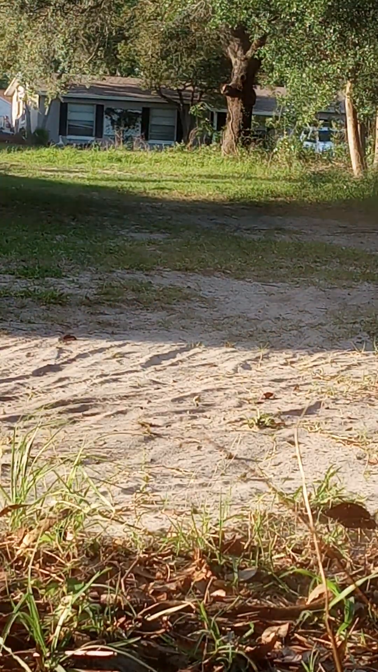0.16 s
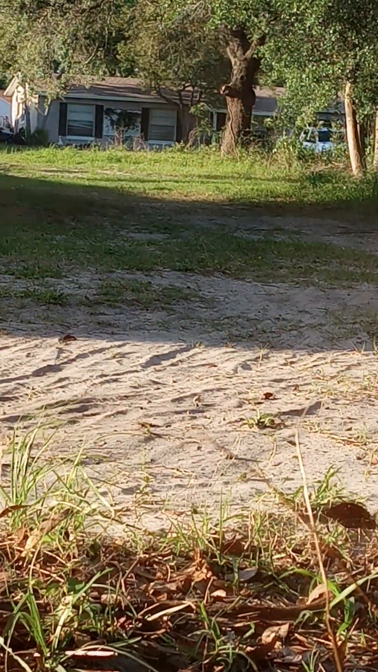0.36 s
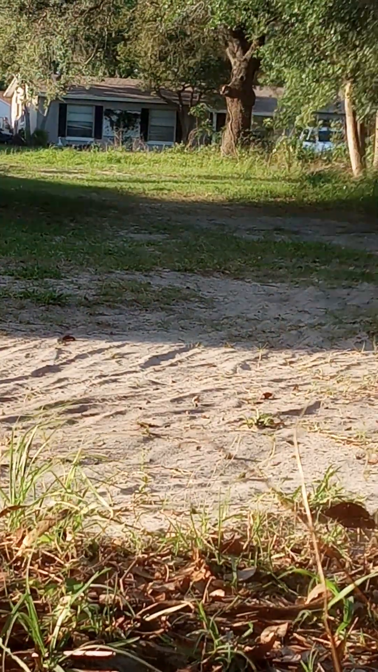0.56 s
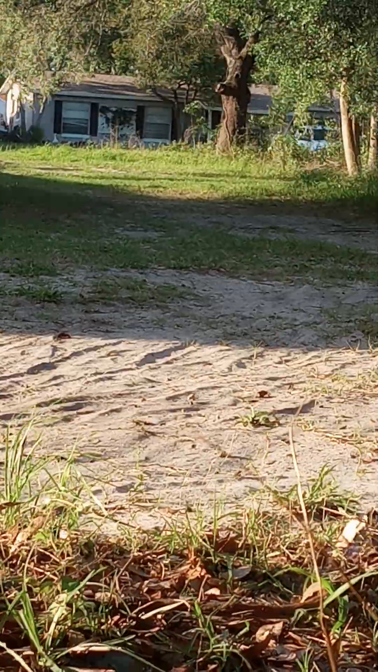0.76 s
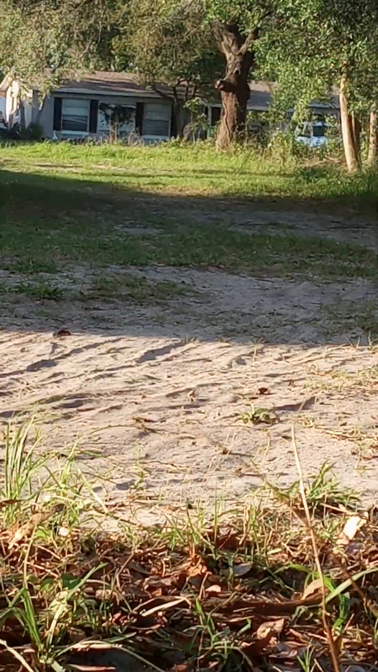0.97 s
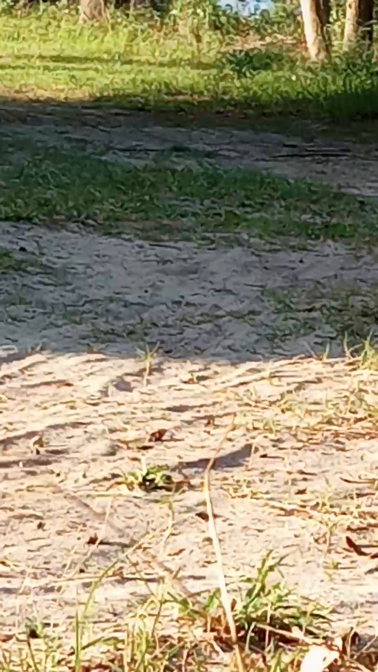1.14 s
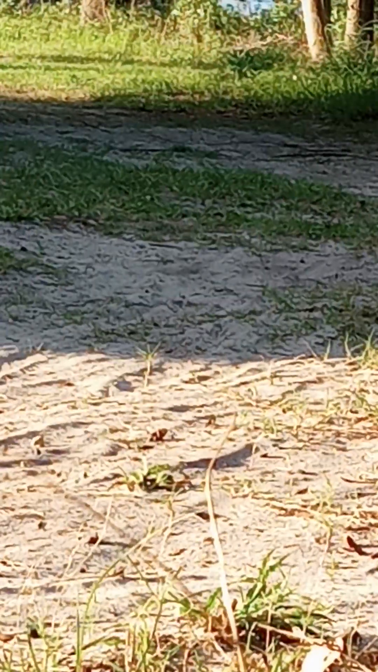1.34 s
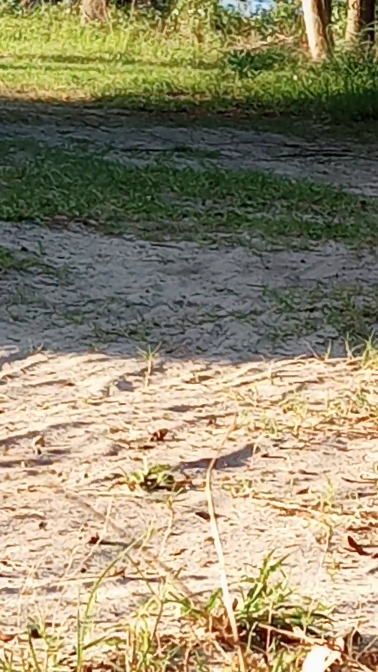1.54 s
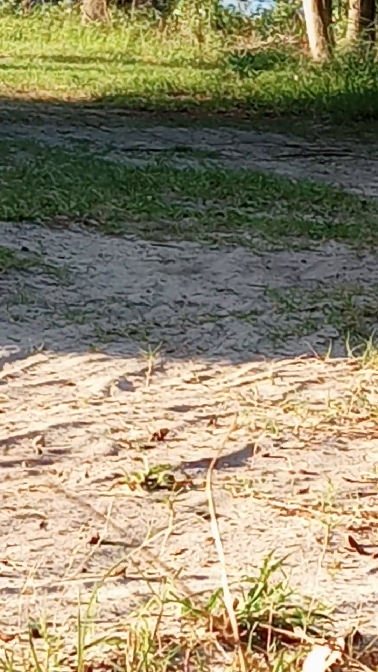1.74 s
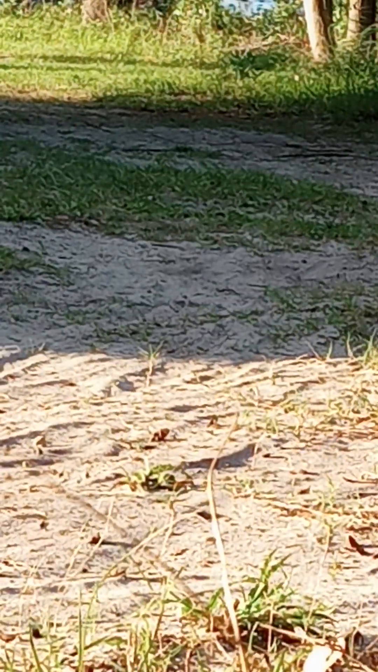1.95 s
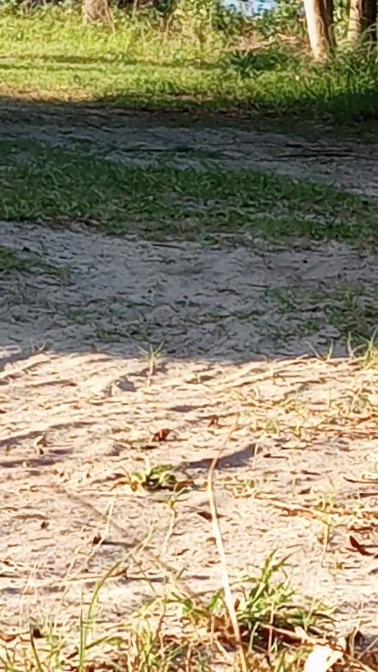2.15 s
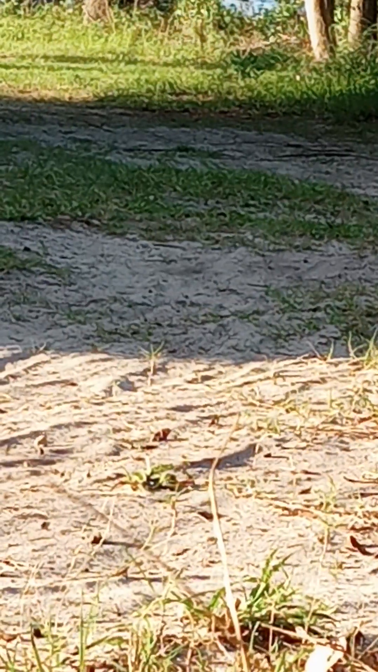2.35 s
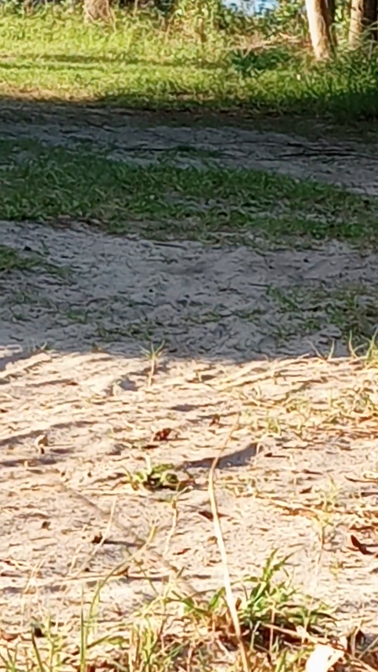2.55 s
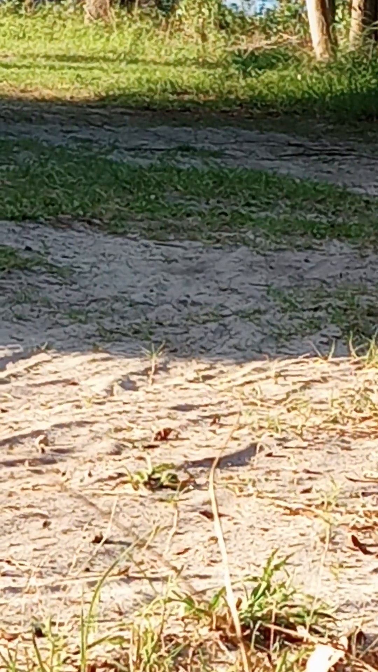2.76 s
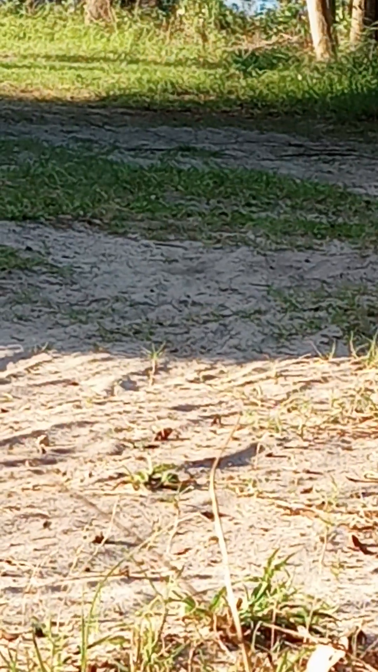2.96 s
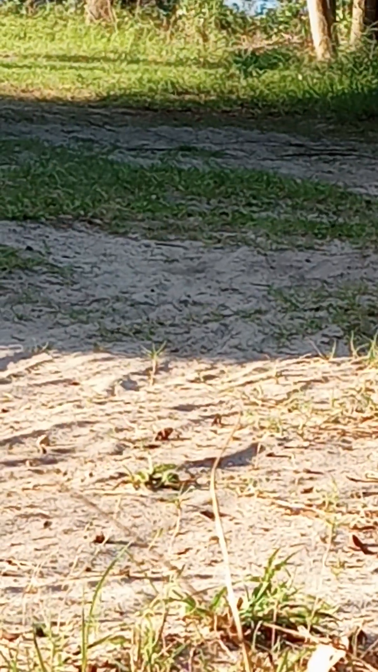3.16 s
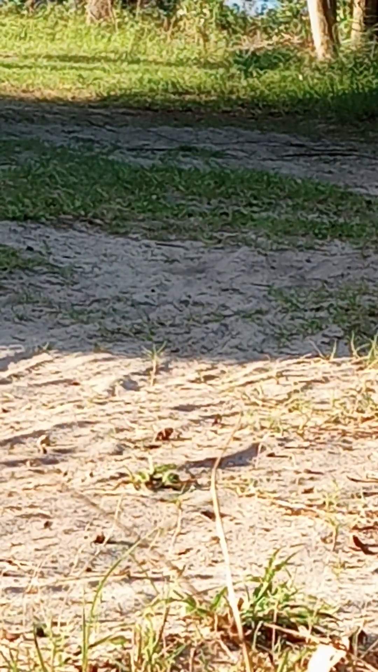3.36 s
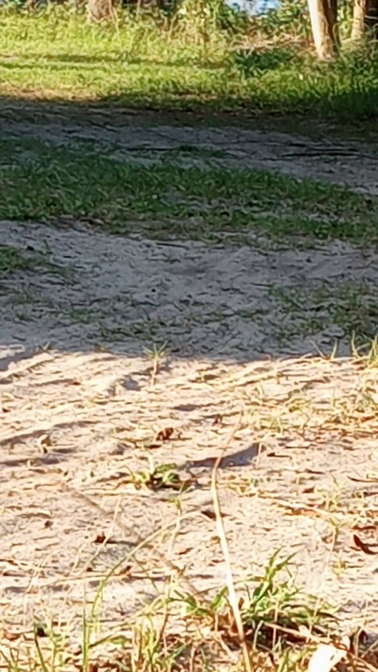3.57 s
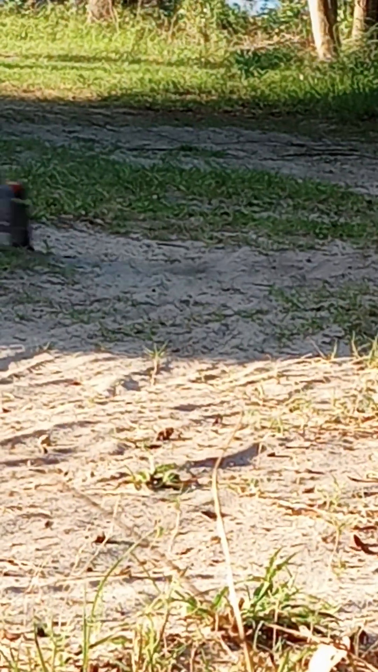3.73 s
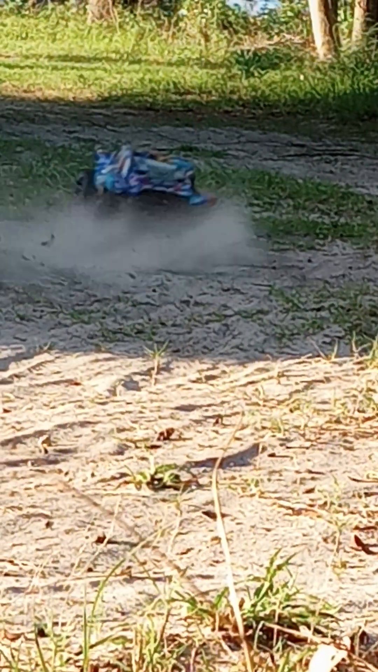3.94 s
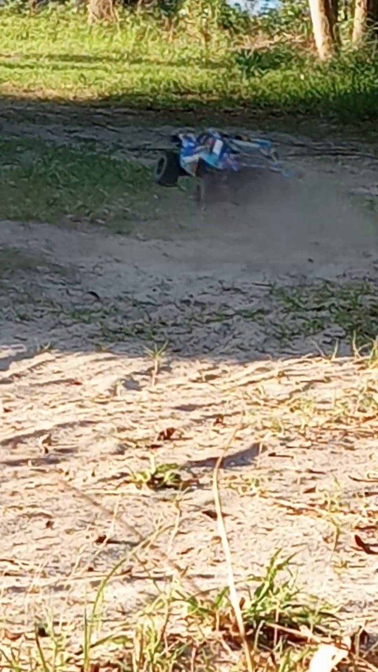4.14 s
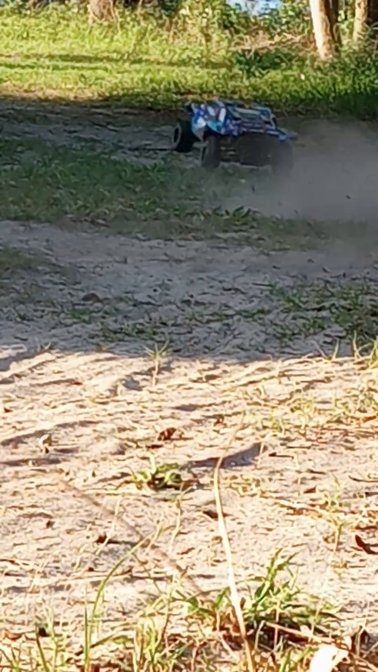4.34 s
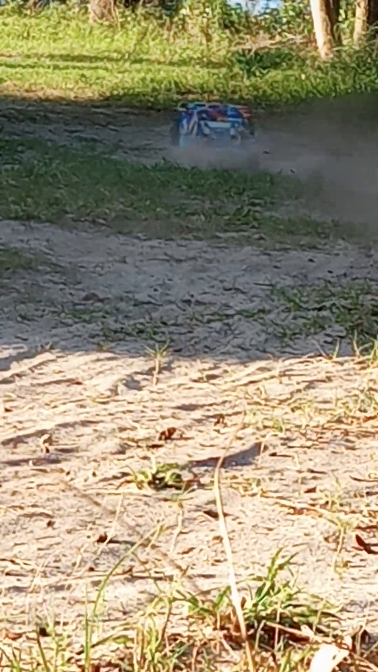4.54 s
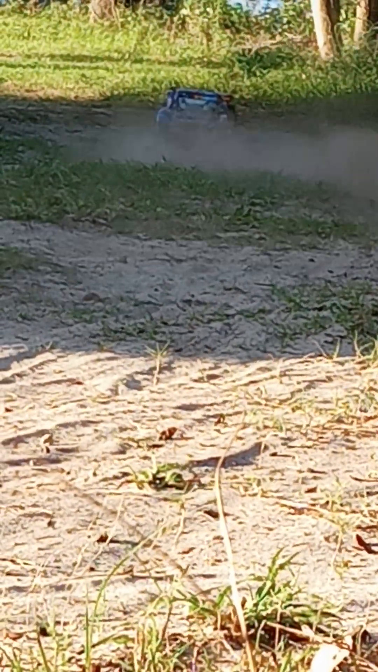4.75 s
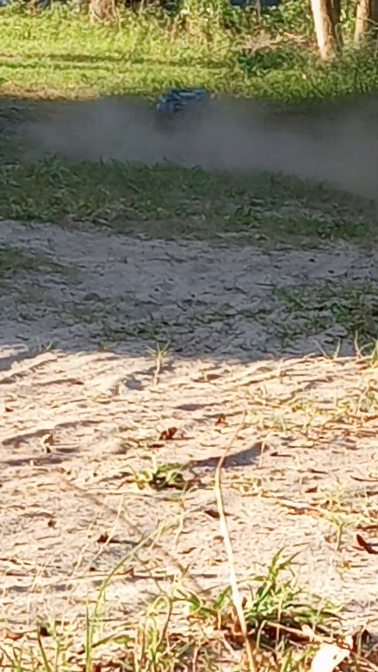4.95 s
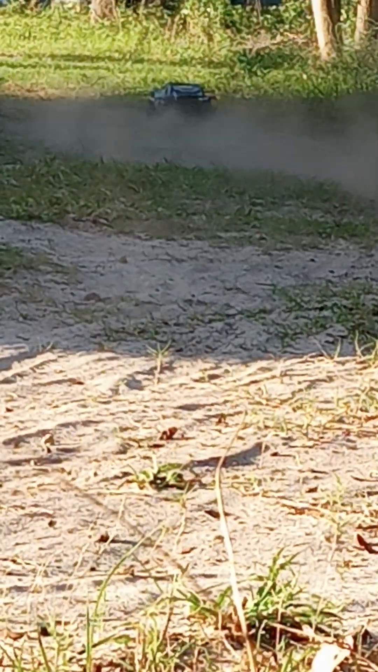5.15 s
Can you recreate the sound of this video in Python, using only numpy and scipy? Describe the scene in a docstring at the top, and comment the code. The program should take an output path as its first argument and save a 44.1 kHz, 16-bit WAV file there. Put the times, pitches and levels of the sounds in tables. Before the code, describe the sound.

Dry leaves crackle and snap close on the right for the first 0.3 seconds, with one light fingertip knock on a housing at the very start. A low outdoor rumble swells softly underneath. The sound cuts out briefly at 0.8 seconds and again from 1.1 to 1.45. At 1.5 seconds a small electric model truck starts close on the right with a short motor groan. It is driven in quick bursts, about four a second, each with a high gear whine that rises and falls, a drivetrain rattle and the hiss of tyres throwing sand. The bursts grow stronger from 2.4 to 3.2 seconds. The chassis thuds over several bumps around 3.3 to 3.5, and sand spatters the body shell. By 4 seconds the truck is farther away ahead, revving higher, with sharp knocks near 4.35, 4.65 and 5 seconds and a faint outdoor echo.

```python
"""A sandy yard. Dry leaves crackle close by over a low outdoor rumble; a fingertip knocks on a housing.
A small electric model truck is then driven in bursts, first close on the right, then away ahead.
Its gear teeth whine with each squeeze of the throttle, the drivetrain rattles, spinning tyres throw
sand and the chassis thuds over bumps. The sound cuts out twice before the truck starts."""
import sys
import numpy as np
from scipy import signal
from scipy.fft import rfft, irfft
from scipy.io import wavfile
from scipy.ndimage import uniform_filter1d

SR = 44100
rng = np.random.default_rng(int(sys.argv[2]) if len(sys.argv) > 2 else 0)


def dump_mix(stems):
    """Bounce the given channels to the path in sys.argv[1] as a 16-bit WAV at rate SR."""
    frames = np.atleast_2d(stems).T  # one column per channel
    limited = np.clip(frames, -1, 1)  # hard clip at full scale
    pcm = np.round(limited * 32767).astype(np.int16)
    wavfile.write(sys.argv[1], SR, pcm)


N = 229408
TIME = np.arange(N) / SR
FREQS = np.maximum(np.arange(N // 2 + 1) * SR / N, 1)
TEETH_PER_SHAFT_TURN, TEETH_PER_WHEEL_TURN = 10, 88
THROTTLE_LAG_S = 0.016
CUTOFF_HZ = 15800

# sand direction, left minus right: t/s, coarse/dB, fine/dB
SAND_PAN = [(1.45, -6, 0), (1.53, -7.5, -15), (2.11, -9.5, -17), (2.38, -2.5, -12), (3.82, 2, -6.5),
            (4.71, 1.5, -3), (5.2, -0.5, -14)]
# sand spectra, truck near: f/Hz, level/dB
COARSE_SAND_NEAR = [(1820, -105), (3100, -4), (3300, -2), (3760, 7), (4620, 9), (5300, 4.5), (5530, 2.5),
                    (6620, 9.5), (7450, -0.5), (7900, 6), (10300, -32), (17400, -120)]
FINE_SAND_NEAR = [(4240, -6), (7200, 1.5), (7470, -5), (7960, -1), (10300, 8), (11200, 12.5), (12400, 7.5),
                  (13900, 3), (14900, 13.5), (15700, 10), (16000, -33)]
# left-right coherence: f/Hz, coherence/0..1
COHERENCE_NEAR = [(30, 0.6), (100, 0.98), (600, 0.94), (1400, 0.8), (3500, 0.8), (7000, 0.2), (11000, 0.19),
                  (15000, 0.14)]
COHERENCE_FAR = [(100, 1), (600, 0.84), (1400, 0.61), (3500, .55), (7000, 0.66), (15000, .2)]
# tyres rolling: t/s, level/dB
ROLLING_LEVEL = [(1.45, -78), (1.55, -63.5), (2.25, -65), (2.42, -59.5), (3.25, -53), (3.58, -71),
                 (4.1, -62.5), (4.5, -71), (4.85, -64.5), (5.1, -73.5)]
# sound cuts out: start/s, end/s
DROPOUTS = [(.804, .845), (1.089, 1.446)]


def from_db(db):
    """Decibels to gain."""
    return 10 ** (np.asarray(db) / 20)


def unit_rms(x):
    """Scale to unit power."""
    return x / np.sqrt(np.mean(x ** 2) + 1e-20)


def over_time(rows):
    """Table columns interpolated per sample."""
    times_s, *columns = np.transpose(rows)
    return [np.interp(TIME, times_s, column) for column in columns]


def over_hz(points):
    """Table interpolated over log frequency."""
    hz, value = np.transpose(points)
    return np.interp(np.log(FREQS), np.log(hz), value)


def phase_of(hz):
    """Running phase in rad."""
    return 2 * np.pi * np.cumsum(hz) / SR


def drift(rate_hz):
    """Smooth random wander, RMS about 1."""
    size, step = 16384, 16
    hz = np.fft.rfftfreq(size, step / SR)
    slow = irfft(rfft(rng.standard_normal(size)) / (1 + (hz / rate_hz) ** 2))
    return np.interp(np.arange(N) / step, np.arange(size), unit_rms(slow))


def lagged(x):
    """First-order lag behind the throttle."""
    pole = np.exp(-1 / (THROTTLE_LAG_S * SR))
    return x[0] + signal.lfilter([1 - pole], [1, -pole], x - x[0])


def pan(left_db):
    """Left and right gains, mean 1."""
    sides = from_db(np.array([[.5], [-.5]]) * left_db)
    return sides / sides.mean(axis=0)


def noise():
    """Two independent white noises."""
    return rng.standard_normal((2, N))


def grains(per_s, spread_db):
    """Two independent streams of tiny random impacts."""
    sizes = from_db(spread_db * np.minimum(rng.exponential(1, (2, N)), 4))
    return unit_rms((rng.random((2, N)) < per_s / SR) * sizes * noise())


def colour(pair, spectrum, coherence):
    """Two independent signals to stereo with this spectral shape and coherence."""
    alike = np.clip(over_hz(coherence), 0, .995)
    width = np.sqrt((1 - alike) / (1 + alike))
    shaped = rfft(pair) * unit_rms(from_db(over_hz(spectrum)))
    mid, side = irfft(shaped * [np.ones_like(width), width], N)
    return np.array([mid + side, mid - side])


def swells(rows):
    """Envelope of events that rise and fall exponentially, summed in power."""
    power = np.zeros(N)
    for peak_s, db, rise_s, fall_s in rows:
        decay = np.maximum((peak_s - TIME) / rise_s, (TIME - peak_s) / fall_s)
        power += from_db(2 * db) * np.exp(-2 * decay)
    return np.sqrt(power)


def bursts(rows, t60_s):
    """Envelope of events that start at once and die away."""
    return sum((TIME >= start_s) * from_db(db - 60 * np.clip((TIME - start_s) / t60_s, 0, 3))
               for start_s, db in rows)


def strike(blows, modes, softness_s):
    """Each blow rings all modes at random strength, favouring those near its centre frequency."""
    out = np.zeros(N)
    for start_s, db, centre_hz in blows:
        first = int(start_s * SR)
        age = TIME[:min(N - first, SR // 4)]
        contact = 1 - np.exp(-age / softness_s)
        for (hz, mode_db, t60_s), chance in zip(modes, rng.standard_normal(len(modes))):
            level_db = db + mode_db + 0.74 * chance - 5 * abs(np.log2(hz / centre_hz))
            ring = from_db(level_db - 60 * age / t60_s) * np.sin(2 * np.pi * hz * age)
            out[first:first + len(age)] += np.sign(chance) * contact * ring
    return out


def outdoors():
    """Low swelling rumble under faint hiss."""
    # peak/s, level/dB, rise/s, fall/s
    rumble_swells = [(.13, -57, .1, 0.24), (.42, -55, .07, 0.28), (.78, -48.5, .06, 0.033),
                     (1.02, -61, .1, 0.12), (1.69, -60, 0.056, 0.023), (2.26, -59.5, 0.1, 0.17),
                     (3.17, -59, 0.06, .05), (4.1, -68, .2, 0.23), (5.15, -53, .3, .2)]
    # f/Hz, level/dB
    rumble_spectrum = [(15, -56.5), (25, -25.5), (32, -28), (67, 1), (103, 4), (151, 2), (188, -8.5),
                       (235, -8.5), (276, -13), (400, -40.5), (520, -67.5), (880, -120)]
    air_spectrum = [(180, -31.5), (300, -6), (405, -12), (486, -9.5), (528, -15), (961, -14.5), (2320, -23),
                    (16000, -41)]
    floor_db, air_db = -64.5, -71.5
    envelope = np.hypot(from_db(floor_db), swells(rumble_swells))
    rumble = envelope * colour(noise(), rumble_spectrum, COHERENCE_NEAR)
    air = from_db(air_db) * colour(noise(), air_spectrum, COHERENCE_FAR)
    return (rumble + air) * pan(left_db=-1.5)


def leaves():
    """Dry leaves rustle and snap close on the right."""
    # peak/s, level/dB, rise/s, fall/s
    rustles = [(.035, -53, 0.033, 0.1), (.15, -48.5, 0.018, 0.023), (.185, -53, 0.014, 0.0086),
               (.268, -64.5, 0.013, 0.0096), (.36, -66.5, 0.019, .03), (.73, -71, 0.039, 0.024)]
    # t/s, level/dB
    snaps = [(.030, -50), (.0595, -41), (.1005, -40), (.139, -37), (.178, -46), (.256, -63), (.5795, -59),
             (.623, -66), (1.078, -66)]
    # f/Hz, level/dB
    leaf_spectrum = [(710, -31), (1200, -8.5), (1540, -17.5), (2650, -15.5), (3400, -5), (5410, -7),
                     (5970, -1), (9110, -19), (10900, -10), (12200, -12), (14800, -11), (16000, -4.5)]
    rustling = swells(rustles) * grains(per_s=2100, spread_db=0)
    snapping = bursts(snaps, t60_s=.028) * noise()
    return colour(rustling + snapping, leaf_spectrum, COHERENCE_NEAR) * pan(left_db=-9)


def finger_knock():
    """A fingertip rings a housing once."""
    # t/s, level/dB, centre/Hz
    knock = [(.059, -38, 940)]
    # f/Hz, level/dB, t60/s
    housing_modes = [(810, 1, 0.022), (1018, 1.5, 0.014), (2000, -6.5, 0.011), (4050, 13.5, 0.0089)]
    return strike(knock, housing_modes, softness_s=0.00032)


def throttle():
    """Per sample: the latest squeeze's settings and the tooth rate, driven while held, then coasting."""
    # start/s, held/s, target tooth rate/Hz, spin-up/s, coast-down/s, tyre slip/s, swell/(dB/s),
    # whine/dB, octave re whine/dB, gear chatter/rad, rattle/dB, coarse sand/dB, fine sand/dB
    squeezes = [ (1.564, 0.078, 3887, 0.034, 0.28, .24, -30, -51, -2, .65, -60.5, -51.5, -50),
                (1.808, .11, 3480, .028, 0.29, .115, -24, -56.5, -4, 0.68, -56.5, -49.5, -52.5),
                (2.064, 0.16, 2670, 0.018, 0.5, .18, 12, -55, 5.5, 0.55, -62, -56.5, -54),
                (2.24, 0.094, 3223, 0.029, 0.38, .135, 11, -57, 2.5, 0.56, -71, -52, -53.5),
                (2.362, 0.099, 5022, .054, .57, .17, -2, -44.5, -9.5, 0.52, -56, -46.5, -46),
                (2.527, 0.052, 4588, .029, .16, .125, -1, -49, 1.5, 0.6, -54, -47, -44),
                (2.642, .11, 5909, .045, .36, 0.3, 17, -41.5, -7, 0.46, -58.5, -43.5, -40),
                (2.917, 0.056, 5183, .033, .34, .16, 0, -41.5, -1.5, .8, -58, -42.5, -38.5),
                (3.071, .11, 5488, 0.082, .32, 0.17, 24.5, -41, 0, 0.63, -57.5, -45.5, -40.5),
                (3.525, .13, 7183, .1, 0.16, 0.11, 116, -52, 5.5, 0.83, -67.5, -54.5, -50),
                (3.748, 0.16, 4660, 0.021, .13, .155, 2.5, -55, 8, 1.86, -58.5, -45, -51.5),
                (4.001, .103, 4347, .046, 0.398, .12, 33, -53, -8, 1.18, -54, -53.5, -55.5),
                (4.116, .12, 6140, .029, .94, .1, 35, -46.5, -2, 1.1, -67, -51, -46.5),
                (4.266, 0.044, 6850, 0.019, .11, .12, -21, -47, -16, 1.43, -55.5, -54.5, -51),
                (4.384, .21, 8975, 0.091, .33, .455, -5.5, -46.5, -25, 1.01, -60.5, -47.5, -44),
                (4.836, .14, 8840, 0.085, 0.53, .165, -6, -52.5, -16, 0.82, -64, -54.5, -57),
                (5.14, .097, 6030, 0.047, 0.22, .1, 15, -92, -22, 1.1, -71, -61, -61)]
    names = ("start_s held_s aim_hz spin_up_s coast_s slip_s swell_db_per_s "
             "whine_db octave_db chatter_rad rattle_db coarse_db fine_db").split()
    rows = np.array(squeezes)
    latest = np.maximum(np.searchsorted(rows[:, 0], TIME) - 1, 0)
    motor = dict(zip(names, rows[latest].T))
    tooth_hz = np.full(N, 1900.0)  # idle
    for start_s, held_s, aim_hz, spin_up_s, coast_s, *_ in squeezes:
        first = int(start_s * SR)
        age = TIME[:N - first]
        driven_hz = aim_hz + (tooth_hz[first] - aim_hz) * np.exp(-np.minimum(age, held_s) / spin_up_s)
        tooth_hz[first:] = driven_hz * np.exp(-np.maximum(age - held_s, 0) / coast_s)
    motor["tooth_hz"] = uniform_filter1d(tooth_hz, size=SR // 45)
    motor["age_s"] = TIME - motor["start_s"]
    return motor


def effort_db(motor, layer, db_per_octave, grip_db_per_s, coast_db, fade_db_per_s):
    """A layer's level follows speed, eases as the tyres grip, then drops and fades once slip ends."""
    age, slip_s = motor["age_s"], motor["slip_s"]
    rest_db = -24  # before the first squeeze
    speed_db = db_per_octave * np.log2(motor["tooth_hz"] / motor["aim_hz"])
    slipping_db = (motor["swell_db_per_s"] - grip_db_per_s) * np.minimum(age, slip_s)
    coasting_db = (age > slip_s) * (coast_db - fade_db_per_s * (age - slip_s))
    return lagged(motor[layer] + np.where(age < 0, rest_db, speed_db + slipping_db + coasting_db))


def gear_tone(phase, wobble_rad, rough_rad, flutter_db):
    """Uneven mesh: shaft runout wobbles the phase, backlash shakes phase and strength."""
    runout = np.sin(phase / TEETH_PER_SHAFT_TURN + 2 * drift(12.7))
    strength = unit_rms(from_db(flutter_db * drift(133)))
    return np.sqrt(2) * strength * np.sin(phase + wobble_rad * runout + rough_rad * drift(197))


def motor_groan():
    """The motor groans at breakaway."""
    # t/s, f/Hz, level/dB
    groan = [(1.44, 800, -70), (1.5, 770, -59.5), (1.51, 711, -48.5), (1.54, 797, -57.5), (1.62, 716, -72)]
    hz, level_db = over_time(groan)
    tone = gear_tone(phase_of(hz), wobble_rad=0.48, rough_rad=0.15, flutter_db=4)
    return from_db(level_db) * tone * (TIME < groan[-1][0])


def shell_hum(far):
    """The ground shakes the body shell into a rough hum that fades with distance."""
    hum_hz, re_rolling_db = 714.7, -1
    phase = 2 * np.pi * hum_hz * TIME + 1.1 * drift(55)
    tone = gear_tone(phase, wobble_rad=0.47, rough_rad=0.21, flutter_db=5)
    return (1 - far) * from_db(over_time(ROLLING_LEVEL)[0] + re_rolling_db) * tone


def shaft_rasp(tooth_hz):
    """The same scrape on each shaft turn: unsteady harmonics that glide with speed."""
    shaft_hz = tooth_hz / TEETH_PER_SHAFT_TURN
    shaft_phase = phase_of(shaft_hz)
    out = np.zeros((2, N))
    for k in range(1, 44):
        strength = from_db(7 * drift(14.8)) * np.sqrt(shaft_hz) * (k * shaft_hz < CUTOFF_HZ)
        phase = k * shaft_phase + 2 * drift(87)
        out += strength * [np.sin(phase), np.sin(phase + 2 * drift(23))]
    return unit_rms(out)


def scrabble(far, near_spectrum, far_spectrum, rasp, per_s, spread_db):
    """Shower of impacts plus shaft rasp; its colour changes as the truck leaves."""
    drive = unit_rms(grains(per_s, spread_db) + rasp)
    close = colour(drive, near_spectrum, COHERENCE_NEAR)
    distant = colour(drive, far_spectrum, COHERENCE_FAR)
    return (1 - far) * close + far * distant


def wheels(motor, far):
    """Tread slaps the ground, the drivetrain rattles, sand flies in a clump on each wheel turn."""
    # tyres hit a rut or land: peak/s, level/dB, rise/s, fall/s
    landings = [(1.915, -51, .07, 0.032), (3.14, -58, 0.0099, 0.041), (3.275, -53.5, .012, .025),
                (3.358, -52.5, 0.0031, 0.076), (3.5, -54, .01, 0.018), (3.725, -53.5, 0.028, 0.044),
                (3.88, -54, 0.011, 0.032), (4.35, -43, 0.021, 0.026), (4.645, -41, .016, 0.052),
                (4.995, -45.5, .002, 0.017)]
    # spectra: f/Hz, level/dB
    tyres_near = [(110, -55), (180, 7), (291, -10), (404, 6.5), (478, 4), (546, 3), (634, -39), (699, 2.5),
                  (873, -22), (954, -5.5), (1130, -14), (1500, -17), (1950, -21), (3300, -120)]
    tyres_far = [(110, -48), (180, -35), (264, -4), (312, -2.5), (414, 6), (669, -10), (758, -14.5),
                 (843, -7.5), (937, -3.5), (1090, -19.5), (1290, -7.5), (1500, -18), (1950, -16.5),
                 (3300, -120)]
    rattle_near = [(760, -63), (1300, -14), (1790, -18), (1980, -6), (2190, 4), (2710, -6), (2950, -0.5),
                   (3290, -11), (3500, -4), (4550, -67), (7700, -120)]
    rattle_far = [(760, -11), (1300, 1), (1450, 3), (1840, -9), (2090, 4), (2580, -1.5), (2980, 6),
                  (3280, -1), (3500, -12), (4550, -41), (7700, -120)]
    coarse_sand_far = [(1820, -101), (3100, -39), (3310, -47), (3500, 4), (3680, 7), (4220, -5.5),
                       (4810, 3.5), (5320, 0.5), (5960, 10.5), (7160, -7), (7900, -1), (10300, -32),
                       (17400, -120)]
    fine_sand_far = [(4240, -17), (7200, -4.5), (7960, -2), (8510, -30), (8770, -16), (9220, 3.5),
                     (10000, 6.5), (10900, 12), (11500, 10), (12200, 7), (13500, 7), (14400, -8),
                     (14900, 16), (15600, 6), (16000, -34)]

    wheel_phase = phase_of(motor["tooth_hz"] * (1 + 0.059 * drift(7.3))) / TEETH_PER_WHEEL_TURN
    clumps_db = (0.31 * np.sin(wheel_phase) + 0.55 * drift(180)) * (1 - 0.24 * far)
    rasp = (.75 - .2 * far) * shaft_rasp(motor["tooth_hz"])
    coarse_pan_db, fine_pan_db = over_time(SAND_PAN)

    tread = np.hypot(from_db(over_time(ROLLING_LEVEL)[0]), swells(landings))
    tyres = scrabble(far, tyres_near, tyres_far, 1.1 * rasp, per_s=2500, spread_db=1.5)
    tyres *= tread * from_db(0.86 * clumps_db)

    rattle_db = effort_db(motor, "rattle_db", db_per_octave=3, grip_db_per_s=19,
                          coast_db=-6.5, fade_db_per_s=18)
    rattle = scrabble(far, rattle_near, rattle_far, rasp, per_s=2300, spread_db=-2.5)
    rattle *= from_db(rattle_db + 3.5 * clumps_db) * pan(0.076 * coarse_pan_db)

    coarse_db = effort_db(motor, "coarse_db", db_per_octave=-1, grip_db_per_s=27,
                          coast_db=-11, fade_db_per_s=53)
    coarse = scrabble(far, COARSE_SAND_NEAR, coarse_sand_far, rasp, per_s=12000, spread_db=4.5)
    coarse *= from_db(coarse_db + clumps_db) * pan(coarse_pan_db)

    fine_db = effort_db(motor, "fine_db", db_per_octave=7.5, grip_db_per_s=29.5,
                        coast_db=-14, fade_db_per_s=5)
    fine = scrabble(far, FINE_SAND_NEAR, fine_sand_far, rasp, per_s=16000, spread_db=7)
    fine *= from_db(fine_db + 2.1 * clumps_db) * pan(fine_pan_db)
    return tyres + rattle + coarse + fine


def gear_whine(motor, level_db, far):
    """Pinion and slower axle gear with overtones, direct and scattered off the ground."""
    axle_ratio, axle_db = .393, -15 + 9 * far
    octave_db, chatter_rad = lagged(motor["octave_db"]), lagged(motor["chatter_rad"])
    coarse_pan_db, fine_pan_db = over_time(SAND_PAN)
    tooth_phase = phase_of(motor["tooth_hz"] * (1 + 0.00482 * drift(39)))
    # multiple of tooth rate, level/dB, chatter factor
    partials = [(1, 0, 1), (2, octave_db, 1.5), (3, octave_db - 16, 2.3),
                (axle_ratio, axle_db, .5), (2 * axle_ratio, -9.5, 1)]
    out = np.zeros((2, N))
    for multiple, partial_db, chatter_factor in partials:
        hz, phase = multiple * motor["tooth_hz"], multiple * tooth_phase
        rough_rad = chatter_factor * chatter_rad
        direct = gear_tone(phase, wobble_rad=.5 * rough_rad, rough_rad=rough_rad, flutter_db=4.5)
        scattered = gear_tone(phase + 2 * drift(89), wobble_rad=0.26, rough_rad=rough_rad, flutter_db=3)
        # high partials are shaded on the left like the fine sand
        left_db = coarse_pan_db + (fine_pan_db - coarse_pan_db) * np.clip((hz - 6000) / 3000, 0, 1)
        radiation = 1 / (1 + (1500 / hz) ** 4)  # a small gearbox radiates lows poorly
        top_fade = np.clip((CUTOFF_HZ - hz) / 1000, 0, 1)
        gain = from_db(level_db + partial_db) * radiation * top_fade
        out += gain * pan(left_db) * (direct + (0.14 + 0.37 * far) * scattered * [[1], [-1]])
    return out


def gearbox_ring(tooth_hz, level_db):
    """The gearbox housing sings as half the tooth rate crosses its resonance."""
    resonance_hz, width_hz = 2223, 69
    mesh = gear_tone(phase_of(tooth_hz / 2), wobble_rad=0.31, rough_rad=0.64, flutter_db=10.5)
    resonator = signal.iirpeak(resonance_hz, resonance_hz / width_hz, fs=SR)
    return signal.lfilter(*resonator, from_db(level_db - 2) * mesh)


def chassis_thuds():
    """Bumps ring the chassis through a soft contact."""
    # t/s, level/dB, centre/Hz
    bumps = [(1.905, -56, 421), (2.022, -49, 745.7), (3.138, -53, 299.8), (3.274, -37.5, 505),
             (3.355, -36, 490.4), (3.374, -41, 479), (3.43, -43, 450), (3.5, -47, 380), (3.70, -63, 381.7),
             (4.344, -33, 805), (4.636, -42, 338.7), (4.659, -31, 796.4), (4.9935, -34.5, 1213)]
    # f/Hz, level/dB, t60/s
    chassis_modes = [(322, 17, 0.018), (496, 17, 0.025), (610, -26, 0.014), (744, -9.5, 0.085),
                     (924, -3.5, 0.076), (1280, 9, 0.026), (2380, 11.5, 0.019)]
    return from_db(-8) * strike(bumps, chassis_modes, softness_s=0.0044)


def sand_sprays():
    """Handfuls of sand hit the body shell."""
    # t/s, relative level/dB
    sprays = [(2.048, -18), (3.2468, -10), (3.482, -32), (3.6207, -39), (3.6351, -36), (3.6519, -34),
              (3.688, -17.5), (3.7895, -17), (3.881, -41), (3.9001, -44), (3.918, -26), (3.941, -27),
              (3.9781, -28.5)]
    envelope = bursts(sprays, t60_s=.032)
    coarse = colour(envelope * noise(), COARSE_SAND_NEAR, COHERENCE_NEAR)
    fine = colour(envelope * noise(), FINE_SAND_NEAR, COHERENCE_NEAR)
    return from_db(-23) * coarse + from_db(-24.5) * fine * pan(left_db=-10)


def truck():
    """All truck sounds, from the end of the second dropout."""
    # t/s, distance/(0 near..1 far)
    distance = [(3.3, 0.2), (4.1, 1)]
    far = over_time(distance)[0]
    motor = throttle()
    whine_db = effort_db(motor, "whine_db", db_per_octave=2.5, grip_db_per_s=25,
                         coast_db=-16.5, fade_db_per_s=126)
    gears = gear_whine(motor, whine_db, far) + gearbox_ring(motor["tooth_hz"], whine_db)
    mix = gears + chassis_thuds() + wheels(motor, far) + sand_sprays() + motor_groan() + shell_hum(far)
    return mix * (TIME > DROPOUTS[1][1])


def reflections(x, count=5, gain=.25):
    """Short, wandering paths via ground and body shell comb the moving truck's sound."""
    out = x.copy()
    for k, lag_s in enumerate(np.geomspace(.0012, .009, count)):
        delayed_s = TIME - lag_s - 0.00015 * drift(1.48)
        out += (-1) ** k * gain * np.array([np.interp(delayed_s, TIME, side) for side in x])
    return out / np.sqrt(1 + count * gain ** 2)


def yard_echo(x, wet_db=-20, t60_s=0.39, delay_s=.02):
    """Adds a thin, dull echo from the trees."""
    age = TIME[:SR // 2]
    tail = rng.standard_normal((2, len(age))) * from_db(-60 * age / t60_s) * (age > delay_s)
    tail = signal.sosfilt(signal.butter(2, [250, 6000], "band", fs=SR, output="sos"), tail)
    tail /= np.sqrt(np.sum(tail[0] ** 2))
    return x + from_db(wet_db) * signal.fftconvolve(x, tail, axes=1)[:, :N]


def scene():
    """Echoing truck, leaves, knock and outdoor rumble."""
    return yard_echo(reflections(truck())) + leaves() + finger_knock() + outdoors()


def record(dry):
    """Two dropouts, a treble lift from the microphone port and a steep top cut."""
    port_hz, width_hz, port_db = 15300, 1400, 4
    gate = np.ones(N)
    for start_s, end_s in DROPOUTS:
        gate[int(start_s * SR):int(end_s * SR)] = from_db(-50)
    gated = dry * uniform_filter1d(gate, size=130)
    port = from_db(port_db / (1 + (2 * (FREQS - port_hz) / width_hz) ** 2))
    top_cut = 1 / (1 + (FREQS / CUTOFF_HZ) ** 240)
    return irfft(rfft(gated) * port * top_cut, N)


dry = scene()
out = record(dry)
dump_mix(out)
```